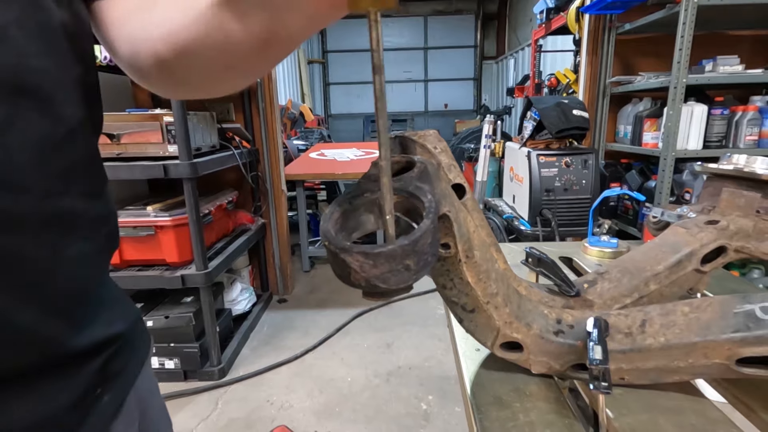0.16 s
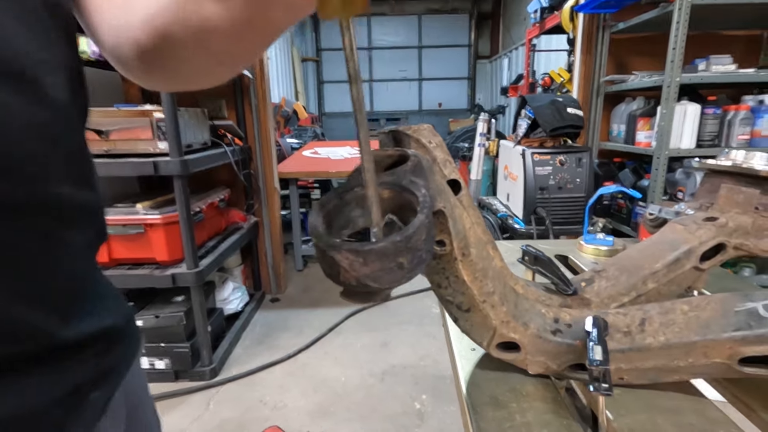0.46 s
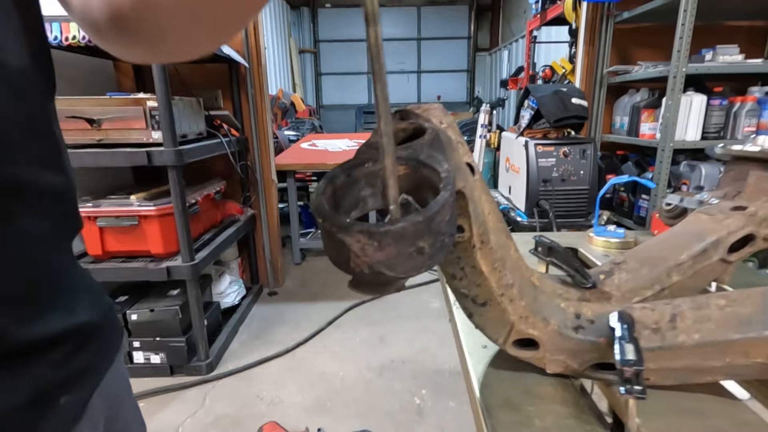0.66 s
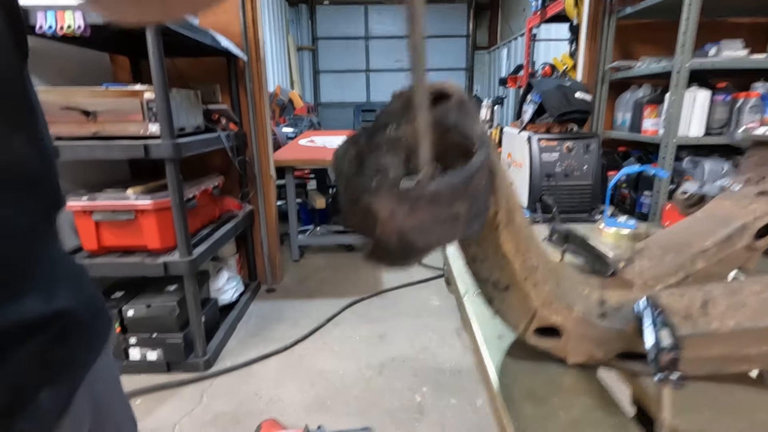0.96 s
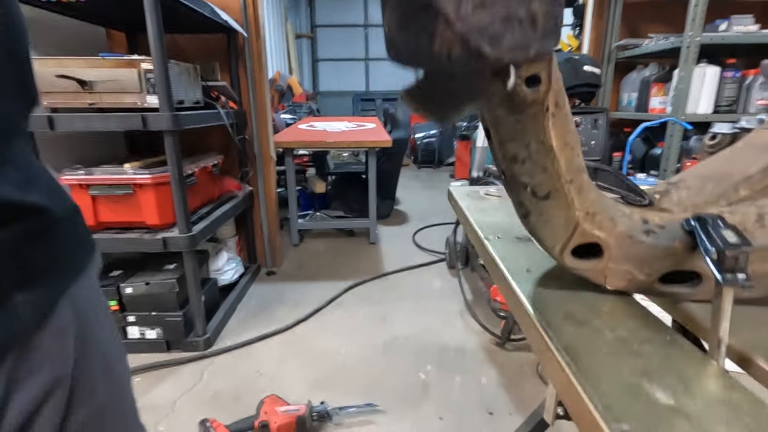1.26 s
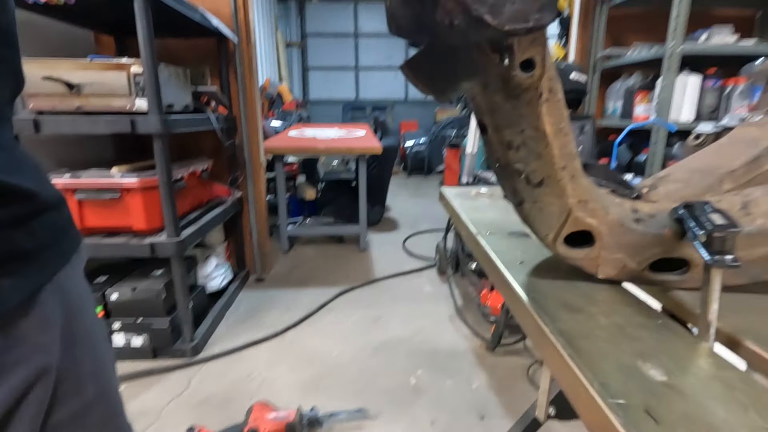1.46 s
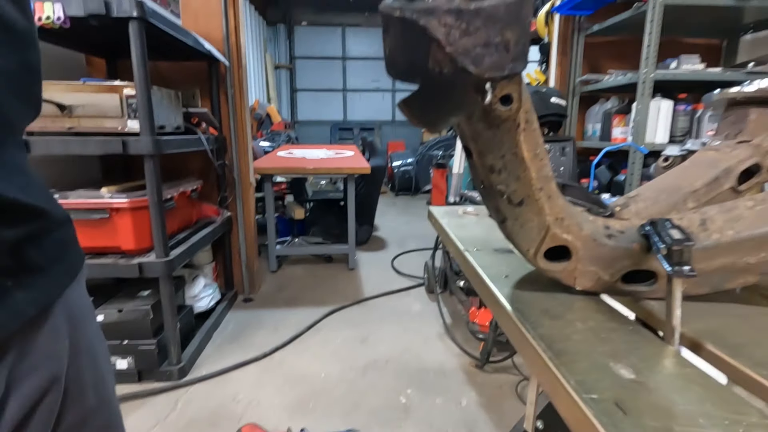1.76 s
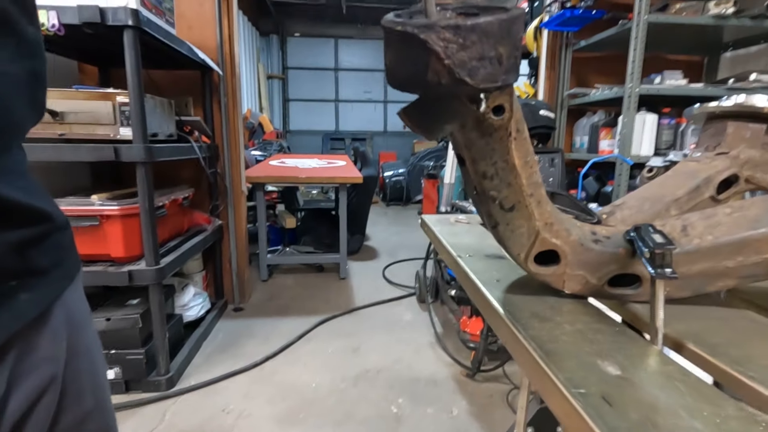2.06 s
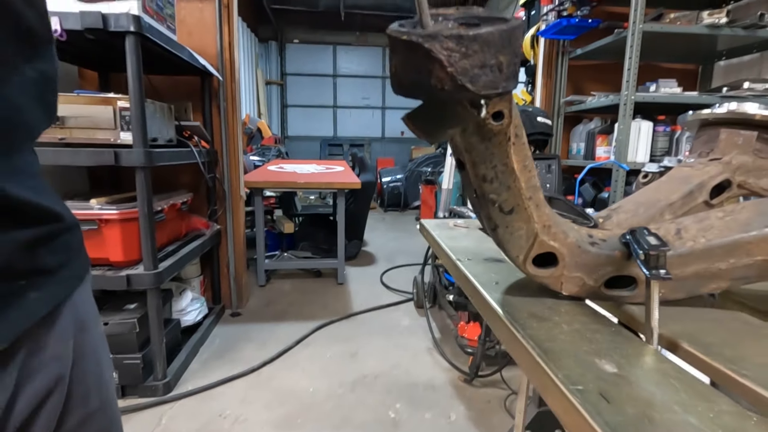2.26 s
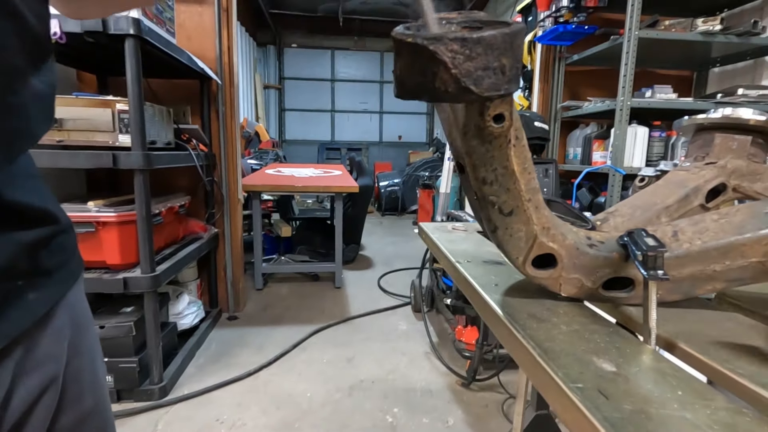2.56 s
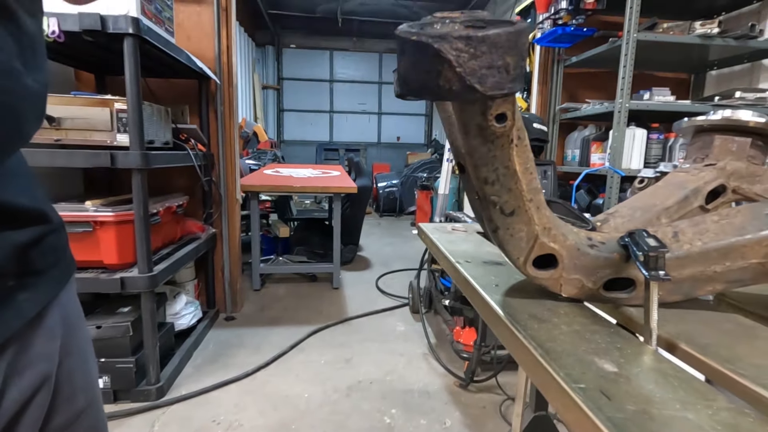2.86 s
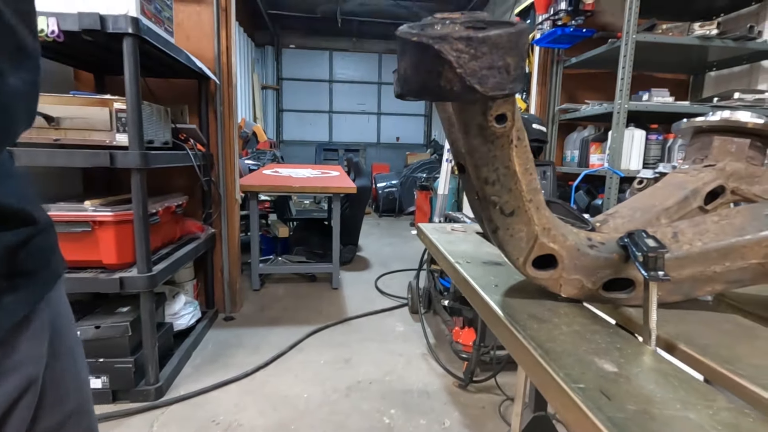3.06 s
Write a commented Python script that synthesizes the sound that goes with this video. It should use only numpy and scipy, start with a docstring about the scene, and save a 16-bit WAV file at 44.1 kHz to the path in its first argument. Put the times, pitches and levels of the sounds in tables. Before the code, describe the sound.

Hammer strikes a chisel in sharp metal blows, then a freed bushing clatters on bench and concrete

```python
"""Close by a garage bench: loose things tick and rumble shakes it, over humming lights and room air.
A hammer drives a chisel four times into a bushing in a clamped steel arm; noise cracks and decaying modes ring.
The chisel taps as it is reset and sings once. The fifth blow frees the bushing, which bounces and rattles
over bench and concrete as trains of small knocks on ringing modes.
The mount sways below hearing throughout, the microphone clips softly, and a faint side signal is heard."""
import sys
import numpy as np
from scipy import signal
from scipy.fft import rfft, irfft
from scipy.io import wavfile
from scipy.ndimage import map_coordinates

SR = 44100
rng = np.random.default_rng(int(sys.argv[2]) if len(sys.argv) > 2 else 0)


def to_linear_factor(level_db):
    """Convert decibel levels (scalar or array-like) to linear amplitude factors."""
    exponent = np.asarray(level_db, float) / 20
    return 10 ** exponent


def master_out(mix):
    """Clip the mix to full scale and print it as 16-bit PCM to the path in sys.argv[1]."""
    frames = np.transpose(np.atleast_2d(mix))
    ceiling = np.clip(frames, -1, 1)
    pcm = np.round(ceiling * 32767).astype(np.int16)
    wavfile.write(sys.argv[1], SR, pcm)


N = 141120
T = np.arange(SR // 2) / SR  # seconds within one sound; each is cut after half a second

# Spectrum of steel struck by steel: pitch_hz, level_db
CRACK_SPECTRUM = [(350, -33), (600, -3), (1050, -22), (1220, -10), (2470, 6), (3080, -7.5), (5370, -5.5),
                  (7800, -7.5), (14600, -21.5), (16500, -41)]
# Ringing modes of the bench: pitch_hz, level_db, t60_s
BENCH_MODES = [(155, -3, .3), (350, -8, .3), (522, 0, .6), (1452, -3, .5)]


def unit(x):
    """Scales a signal to rms 1."""
    return x / np.sqrt(np.mean(x ** 2) + 1e-20)


def along(points, hz):
    """Reads a curve of (Hz, value) points on a log frequency axis."""
    f, v = np.transpose(points)
    return np.interp(np.log(hz + 1), np.log(f + 1), v)


def curves(rows):
    """Gives one value per sample for each column after the time."""
    s, *columns = np.transpose(rows)
    return [np.interp(np.arange(N) / SR, s, column) for column in columns]


def noise(spectrum, size, tilt_db=0):
    """Coloured noise of rms 1, tilted around 3 kHz by tilt_db per octave."""
    hz = np.fft.rfftfreq(size, 1 / SR)
    gain = to_linear_factor(along(spectrum, hz) + tilt_db * np.log2(hz / 3000 + 0.007))
    return unit(irfft(rfft(rng.standard_normal(size)) * gain, size))


def dying(t60, attack_s=0.000089):
    """A fast rise and an exponential fall, never shorter than a t60 of 2 ms."""
    return to_linear_factor(-60 * T / max(t60, .002)) * (1 - np.exp(-T / attack_s))


def ring(modes, scatter_db, bright_hz=1000, focus_db=0):
    """Struck modes: each a decaying sine with new level and phase and a slightly wandering pitch.

    focus_db is the loss per squared octave away from the brightest pitch.
    """
    hz, db, t60 = np.transpose(modes)[:, :, None]
    draw = rng.standard_normal((2, len(modes), 1))
    phase_drift = .03 * np.cumsum(rng.standard_normal((len(modes), len(T))), axis=1)
    focus_loss = focus_db * np.log2(hz / bright_hz) ** 2
    level = db - focus_loss + scatter_db * draw[0] - 60 * T / t60
    sines = np.sin(2 * np.pi * hz * T + draw[1] + phase_drift)
    return (to_linear_factor(level) * sines).sum(0) / np.sqrt(len(modes))


def grainy(rate_hz, depth_db):
    """Uneven gain of many small contacts, wandering at random in dB."""
    points = rng.standard_normal(int(rate_hz) + 4)
    return to_linear_factor(depth_db * map_coordinates(points, [T * rate_hz], order=1))


def add(track, s, sound):
    """Lays a sound on the track, then its garage tail: noise that dies at its own rate in each band."""
    # Reverberation of the garage: pitch_hz, t60_s
    garage_decay = [(150, 0.49), (1000, 0.52), (4000, 0.41), (12000, 0.16)]
    delay_s, tail_db = .006, -22
    hz, t, z = signal.stft(rng.standard_normal(SR // 2), SR, nperseg=256)
    decay = to_linear_factor(-60 * t / along(garage_decay, hz)[:, None])
    tail = signal.istft(z * decay, SR, nperseg=256)[1]
    wet = signal.fftconvolve(sound, tail / np.linalg.norm(tail))[:len(T)]
    i, j = round(s * SR), round((s + delay_s) * SR)
    track[i:i + len(T)] += sound
    track[j:j + len(T)] += to_linear_factor(tail_db) * wet


def weigh_body(rows, body_db):
    """Shifts the level of a table's rows below 1.1 kHz, the body of a blow."""
    return [(hz, level + body_db * (hz < 1100), *rest) for hz, level, *rest in rows]


def hammer(track):
    """Each blow cracks, rings the damped arm, thumps and hums the bench, and leaves a fading buzz."""
    # Blows: start_s, level_db before clipping, thump_db, bright_hz, buzz_db, body_db (shift below 1.1 kHz)
    # thump_db and buzz_db are relative to the blow
    blows = [(0.4769, -7, -17, 2584, -27, 10.5), (0.8185, -10.5, -6.5, 880, -23.5, -0.3),
             (1.154, -9.5, -7.5, 2130, -25.5, 6), (1.428, -11.5, -23.5, 993, -19, -10.5),
             (2.3551, -8, -28.5, 3860, -32, -15.5)]
    # Short modes of the clamped arm: pitch_hz, level_db, t60_s
    arm_modes = [(544, 2, 0.018), (864, -3, 0.011), (1392, -8.5, 0.032), (1667, -17, 0.069),
                 (2255, -9, 0.015), (2534, -7, 0.0089), (3500, -6.5, 0.0096), (4694, -15.5, 0.059),
                 (6560, -13.5, 0.037), (7870, -4, 0.005), (11300, -10, .01)]
    # Longer modes of the far tubes of the frame: pitch_hz, level_db, t60_s
    frame_modes = [(1380, -6, .3), (1730, -5, .25), (1870, -2, .18), (2855, -1, .22), (3520, -3, .16),
                   (4610, 0, .12), (5290, -5, .15), (5880, -7, .17)]
    # Spectrum of arm and bench buzzing on: pitch_hz, level_db
    buzz_spectrum = [(59, -32.5), (100, -4.5), (418, -11.5), (1870, 3), (2570, -15), (2860, 1.5),
                     (12000, -26), (14800, -33), (16500, -64)]
    arm_db, contact_db, bench_db, frame_db = 11, 1.5, -45, -21  # relative to the blow

    for s, db, thump_db, hz, buzz_db, body_db in blows:
        colour = weigh_body(CRACK_SPECTRUM, body_db)
        crack = to_linear_factor(-0.5) * noise(colour, len(T)) * dying(0.021)
        crack = crack + to_linear_factor(-6.5) * noise(colour, len(T), 1) * dying(0.0017)  # brighter, briefer edge
        thump = sum(np.sin(2 * np.pi * f * T) for f in (48, 163, 310))
        thump = thump * dying(0.022, attack_s=0.00022)
        buzz = noise(buzz_spectrum, len(T)) * dying(.26) * grainy(rate_hz=900, depth_db=-4.5)
        arm = to_linear_factor(arm_db) * ring(weigh_body(arm_modes, body_db), 1.5, hz, focus_db=4)
        tip = to_linear_factor(contact_db) * np.sin(2 * np.pi * hz * T) * dying(.015)  # chisel tip at the brightest pitch
        bench = to_linear_factor(bench_db) * ring(BENCH_MODES, 1.1)
        frame = to_linear_factor(frame_db) * ring(frame_modes, 3)
        blow = crack + arm + tip + to_linear_factor(thump_db) * thump + to_linear_factor(buzz_db) * buzz + bench + frame
        add(track, s, to_linear_factor(db) * blow)


def bushing(track):
    """Landings click and skids swell in; each is a train of small knocks that rattles and rings the sleeve."""
    # Landings: start_s, level_db, ring_db (before a shared lift of 5 dB), bright_hz, dying_t60_s
    landings = [(2.3632, -17.5, -10, 4500, .007), (2.369, -17, -4.5, 2100, 0.0064),
                (2.374, -19.5, -11.5, 2000, 0.01), (2.4502, -15, -5.5, 5090, 0.033),
                (2.4662, -10.5, -5, 3000, 0.18), (2.4698, -12, -9.5, 3500, .04),
                (2.5002, -15.5, -4, 3300, 0.033), (2.547, -25, 1.5, 1600, 0.023),
                (2.581, -26, -14, 4600, 0.064), (2.535, -19.5, -6.5, 5000, 0.16),
                (2.575, -21, -0.5, 4700, 0.047), (2.6132, -12.5, -7, 5660, 0.15),
                (2.7808, -20, -7, 5740, 0.1), (2.807, -27, -2, 4120, .08), (2.988, -49, 6, 10020, 0.09)]
    # Skids: start_s, level_db, ring_db (before a shared lift of 5 dB), bright_hz, dying_t60_s
    skids = [(2.495, -13.5, -3.5, 2300, 0.16), (2.543, -25, -19, 1650, 0.81), (2.64, -17, -3.5, 1880, 0.25),
             (2.80, -13.5, -2, 4193, 0.068), (2.815, -21, -5.5, 1620, 0.27), (2.95, -57, 11, 12800, 0.51),
             (3.015, -37.5, -8.5, 780, 0.26)]
    # Modes of the sleeve, before the overall fade below: pitch_hz, level_db, t60_s
    sleeve_modes = [(1100, -9, .12), (1300, -8, .15), (1567, -1, .24), (1645, -2, .18), (1880, -5, .2),
                    (2065, 0, .16), (2284, -5, .08), (3033, -3, .09), (3093, -7, .13), (3478, -6, .2),
                    (3800, -7, .18), (4177, -2, .22), (4762, -5, .2), (5761, -6, .15), (6228, -7, .09),
                    (9044, -9, .2), (12400, -10, .15), (14830, -15, .15)]
    # Spectrum of the rattle, before its tilt: pitch_hz, level_db
    rattle_spectrum = [(59, -55.5), (100, -43.5), (655, -10.5), (1380, -5), (1610, -3.5), (2740, -8),
                       (4200, -6), (11000, -22), (15100, -37), (16500, -46)]
    contacts_per_s, contact_spread_db = 320, 4
    grit_share, tilt_db = .4, 3.5  # tilt: dB per octave for each octave of brightest pitch over 3 kHz
    struck_db, bench_db = -7, -33

    for table, rise_s, click_db in ((landings, .0002, -1), (skids, 0.012, -40)):
        for s, db, ring_db, hz, t60 in table:
            chance = rng.random((2, len(T)))
            heights = to_linear_factor(-contact_spread_db * np.log(chance[1] + 0.056))
            knocks = (chance[0] < contacts_per_s / SR) * heights
            grit = signal.fftconvolve(knocks, dying(0.0068)[:900])[:len(T)]
            fading = dying(t60, rise_s)
            click = to_linear_factor(click_db) * dying(.005)
            shape = to_linear_factor(-8.5) * fading * (0.87 + grit_share * unit(grit)) + click
            rattle = noise(rattle_spectrum, len(T), tilt_db * np.log2(hz / 3000)) * shape

            sleeve = ring(sleeve_modes, 1.5, hz, focus_db=11)  # mostly the modes near the brightest pitch
            fading_knocks = knocks * fading
            struck = signal.fftconvolve(fading_knocks, sleeve)[:len(T)]
            struck = struck / np.sqrt(np.sum(fading_knocks ** 2) + 1e-9)
            bench = to_linear_factor(bench_db) * ring(BENCH_MODES[1:], 1)
            metal = sleeve * dying(.5, rise_s) + to_linear_factor(struck_db) * struck + bench
            add(track, s, to_linear_factor(db) * (rattle + to_linear_factor(ring_db + 5.0) * metal))


def chisel(track):
    """Light taps knock the arm and ring the chisel, which the hand soon damps; once it sings freely."""
    # Taps: start_s, level_db, bright_hz, hand_damping_t60_s
    taps = [(1.4853, -23.5, 2900, 0.013), (1.5003, -33, 2540, 0.02), (1.508, -30.5, 3500, 0.081),
            (1.9084, -32, 3960, 0.062)]
    # Modes of the chisel out of the hand: pitch_hz, level_db, t60_s
    chisel_modes = [(900, -14, .3), (1600, -14, .1), (2370, 0, .4), (3900, -2, .025), (4665, -13, .07),
                    (5910, -5, .05), (9200, -11, .15), (10520, -12, .04)]

    for s, db, hz, t60 in taps:
        knock = to_linear_factor(-4) * noise(CRACK_SPECTRUM, len(T), .5) * dying(.03)
        knock = knock + to_linear_factor(-9) * np.sin(2 * np.pi * 420 * T) * dying(.025)
        steel = ring(chisel_modes, 1.5, hz, focus_db=6) * dying(t60, attack_s=0.00026)
        add(track, s, to_linear_factor(db) * (knock + to_linear_factor(9) * steel))

    sing_s = (1.535, 1.575, 1.595)  # loose, loudest, gripped again
    swell = np.interp(T + sing_s[0], sing_s, [0, 1, 0])
    add(track, sing_s[0], to_linear_factor(-32) * swell * ring(chisel_modes[2::4], 0.49))


def ticks(track):
    """Loose things tick on the shaking bench: a thin click leads each small burst of noise."""
    # Ticks: start_s, level_db (before a shared cut of 7 dB), dying_t60_s, tilt_db per octave
    tick_rows = [(0.1452, -51, 0.027, 4), (0.399, -46.5, 0.1, 1.5), (0.5231, -50, 0.41, 14),
                 (0.6397, -35.5, 0.095, -3), (0.6667, -40.5, 0.19, 1), (0.7181, -54, 0.11, 5),
                 (0.7516, -44.5, 0.34, -1), (0.866, -42, 0.22, -8.5), (0.9095, -37.5, 0.093, 3.5),
                 (1.0211, -42, 0.23, -2.5), (1.099, -47, 0.12, -8.5), (1.276, -39.5, 0.089, 2.5),
                 (1.6079, -53, 0.22, 3.5), (1.729, -45.5, 0.18, -1.5), (1.8662, -49.5, 0.44, -0.5),
                 (1.925, -41, 0.21, -2), (2.0067, -43.5, 0.19, -1), (2.1104, -48.5, 0.19, -1.5),
                 (2.2545, -47, 0.17, -2.5)]
    # Spectrum of a tick, before its tilt: pitch_hz, level_db
    tick_spectrum = [(240, -33.5), (400, -15.5), (817, -7), (1180, -7), (1720, 1.5), (1940, -13),
                     (2120, -3), (5320, -21), (14000, -42.5)]

    for s, db, t60, tilt_db in tick_rows:
        click = to_linear_factor(-2.5) * noise(tick_spectrum, len(T), tilt_db + 1.0) * dying(0.011, attack_s=.0003)
        burst = noise(tick_spectrum, len(T), tilt_db) * dying(t60, attack_s=0.001)
        burst = burst * grainy(rate_hz=140, depth_db=0.5)
        add(track, s, to_linear_factor(db - 7) * (click + burst))


def background():
    """Sines for the mount's sway and the lights' hum, shaped noise for the rumble and room air."""
    # Sway of the mount: time_s, pitch_hz, level_db rms
    sway_rows = [(0.0, 9.4, -51), (0.16, 10.1, -62.5), (0.4, 10.1, -59), (0.52, 12, -56.5),
                 (0.64, 9.6, -46.5), (0.81, 11.4, -45), (1.32, 11.4, -38.5), (1.39, 9.1, -47.5),
                 (1.49, 11.4, -40.5), (1.79, 11, -48), (1.99, 11, -36.5), (2.52, 8.4, -48.5),
                 (3.03, 11.3, -45.5), (3.2, 10.5, -51)]
    # Spectrum of the rumble: pitch_hz, level_db
    rumble_spectrum = [(9.4, -27.5), (16, -3.5), (30, -3.5), (43, -31), (70, -44.5), (91, -46.5),
                       (150, -120)]
    # Course of the rumble: time_s, level_db rms
    rumble_course = [(0.0, -88.5), (0.5, -38.5), (0.69, -53.5), (1.31, -48), (2.05, -61.5), (2.73, -62),
                     (3.2, -50.5)]
    # Hum of the lights: pitch_hz, level_db rms
    hum_tones = [(76, -73), (120, -77.5)]
    # Spectrum of the room air: pitch_hz, level_db
    air_spectrum = [(35, -13), (60, -10.5), (204, -9), (796, -12.5), (1210, -15), (2040, -17.5),
                    (2350, -22), (11100, -39.5), (14700, -45), (16500, -71)]

    hz, db = curves(sway_rows)
    sway = np.sqrt(2) * to_linear_factor(db) * np.sin(2 * np.pi * np.cumsum(hz) / SR)
    t = np.arange(N) / SR
    hum = sum(np.sqrt(2) * to_linear_factor(level) * np.sin(2 * np.pi * f * t) for f, level in hum_tones)
    rumble = to_linear_factor(curves(rumble_course)[0]) * noise(rumble_spectrum, N)
    air = to_linear_factor(-65) * noise(air_spectrum, N)
    return sway + hum + rumble + air


def scene():
    """All sources reach one point, the same in both channels."""
    track = np.zeros(N + SR)
    for add_source in (hammer, bushing, chisel, ticks):
        add_source(track)
    return np.tile(track[:N] + background(), (2, 1))


def top_cut(x):
    """Nothing passes above the cut-off."""
    return signal.sosfilt(signal.butter(12, 16990, fs=SR, output="sos"), x)


def record(dry):
    """A microphone clips softly; a faint side signal, strongest in the treble, is made from the mid plus hiss."""
    # Side signal made from the mid: pitch_hz, side_over_mid_db
    side_gain = [(60, -60.5), (300, -34.5), (1500, -40), (5000, -40), (9000, -16), (15000, -12)]
    # Spectrum of a faint hiss, opposite in left and right: pitch_hz, level_db
    hiss_spectrum = [(300, -24), (2500, 8), (5000, 1.5), (8000, 1), (9000, -30)]
    clip_top, clip_hardness = .43, 5

    mono = dry.mean(0)
    mid = mono / (1 + np.abs(mono / clip_top) ** clip_hardness) ** (1 / clip_hardness)
    gain = to_linear_factor(along(side_gain, np.fft.rfftfreq(N, 1 / SR)))
    side = irfft(rfft(mid) * 1j * gain, N)  # a quarter turn of phase from the mid
    side = side + to_linear_factor(-88) * noise(hiss_spectrum, N)
    return top_cut(np.array([mid + side, mid - side]))


dry = scene()
out = record(dry)
master_out(out)
```